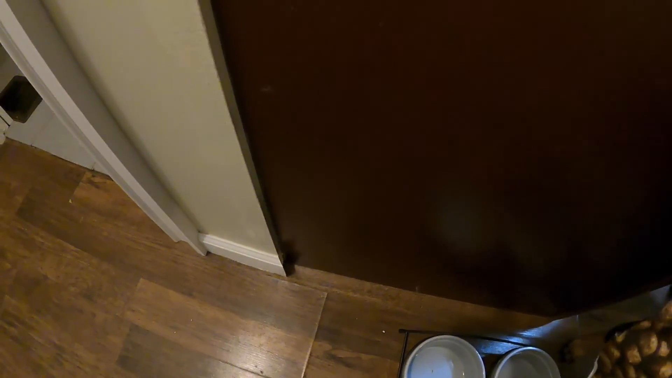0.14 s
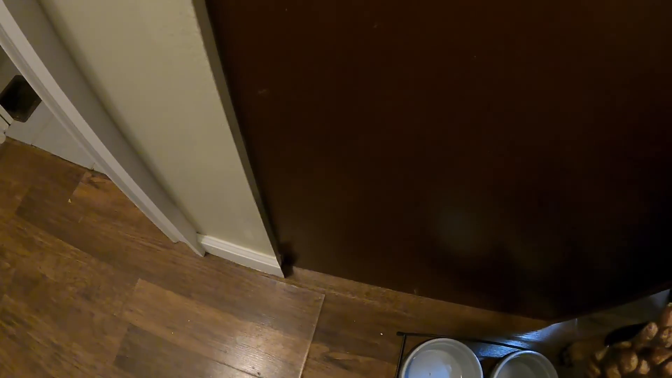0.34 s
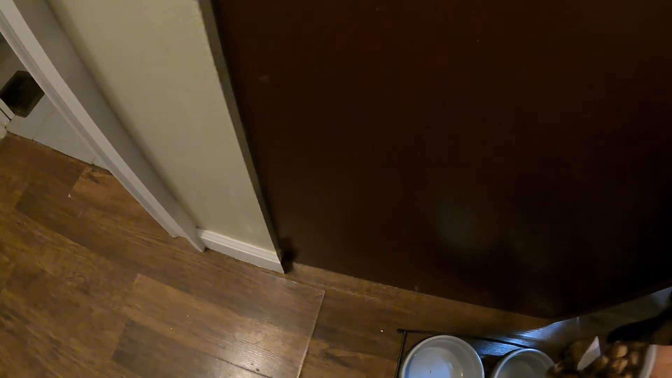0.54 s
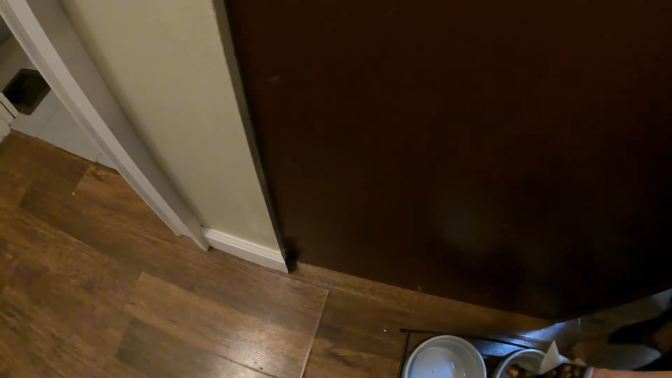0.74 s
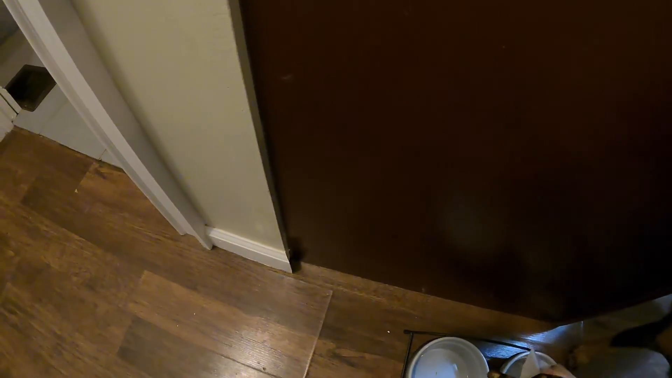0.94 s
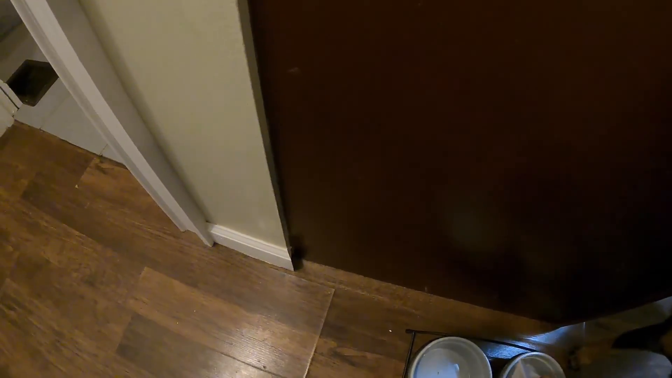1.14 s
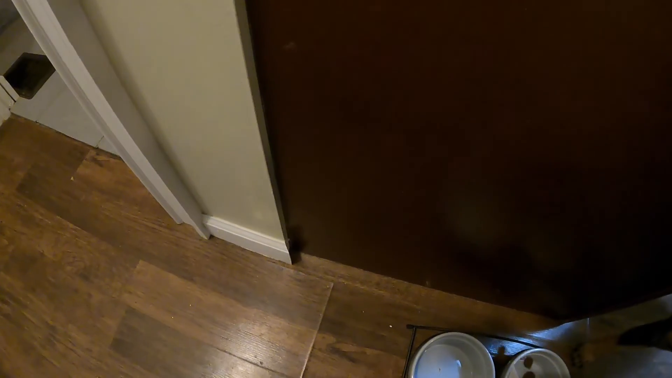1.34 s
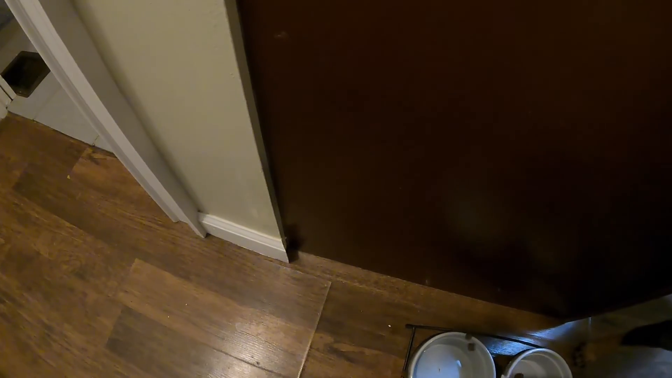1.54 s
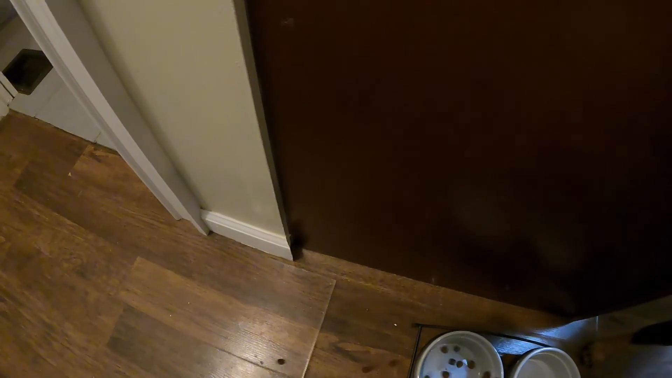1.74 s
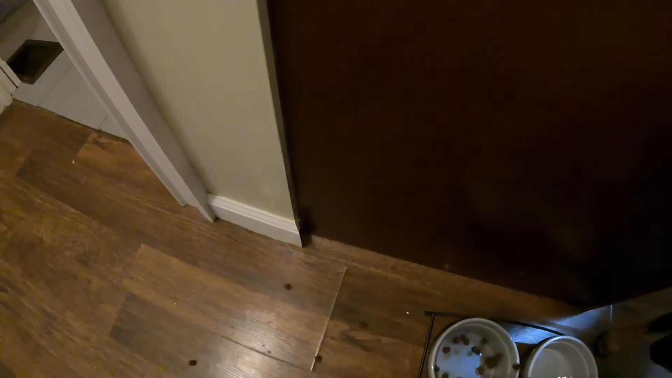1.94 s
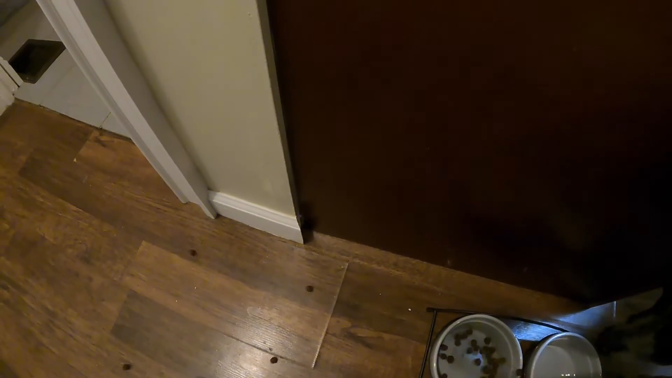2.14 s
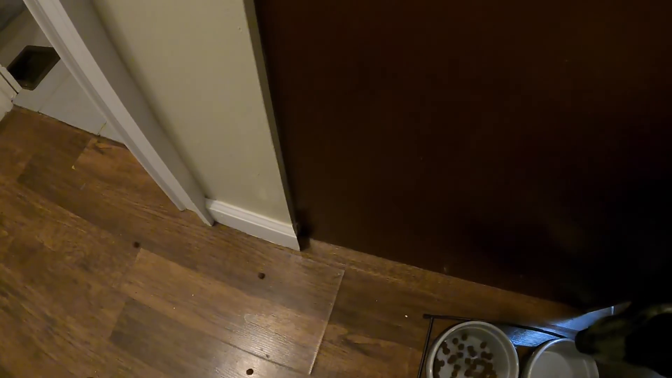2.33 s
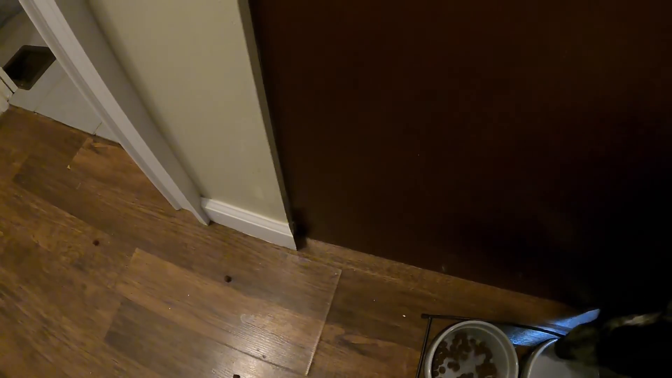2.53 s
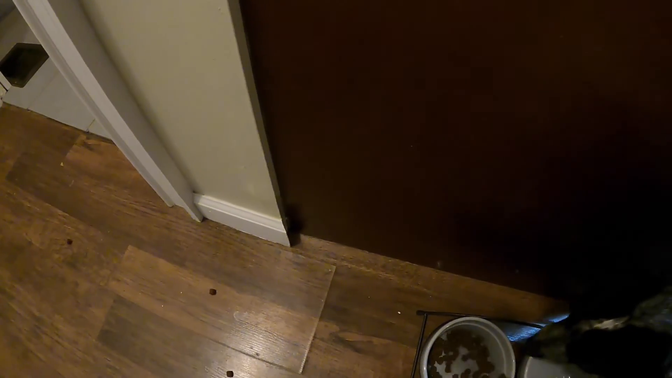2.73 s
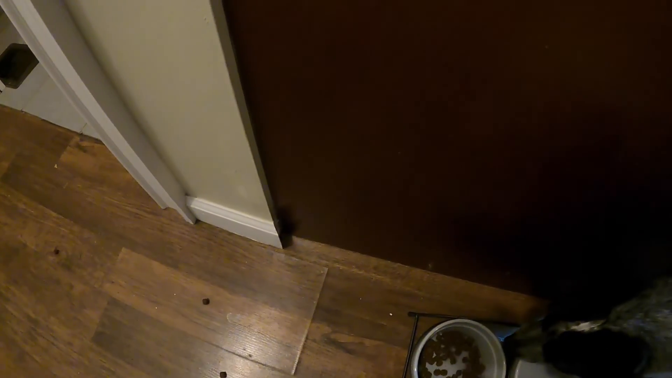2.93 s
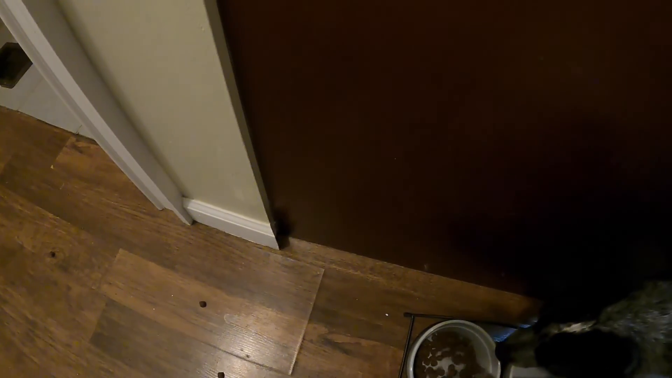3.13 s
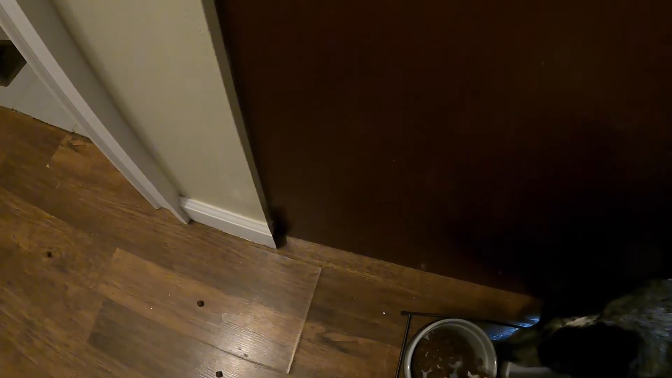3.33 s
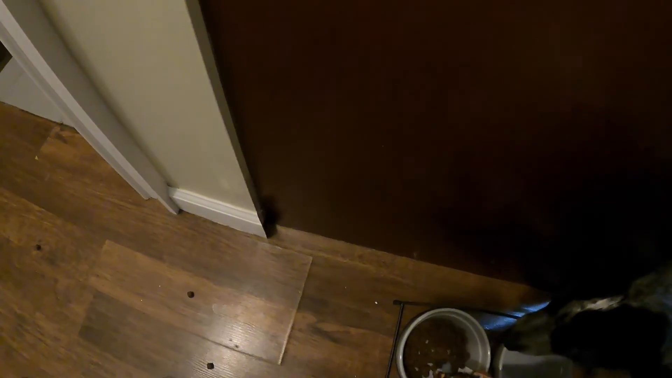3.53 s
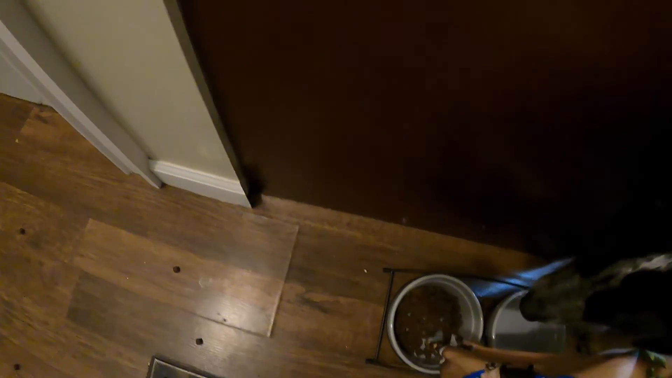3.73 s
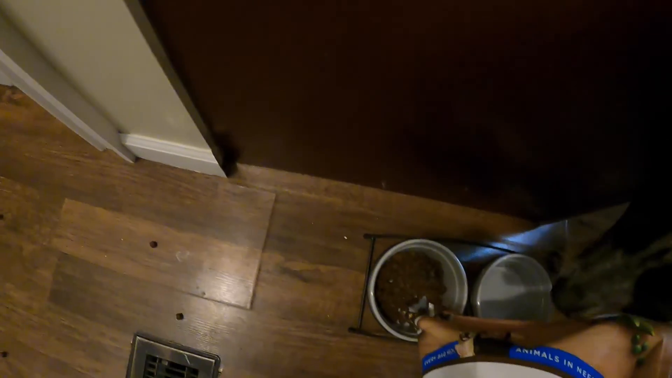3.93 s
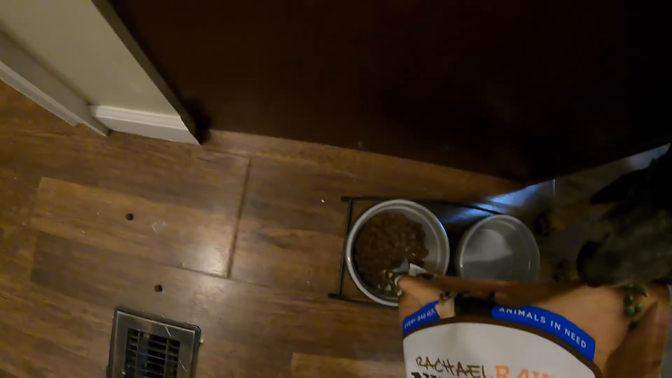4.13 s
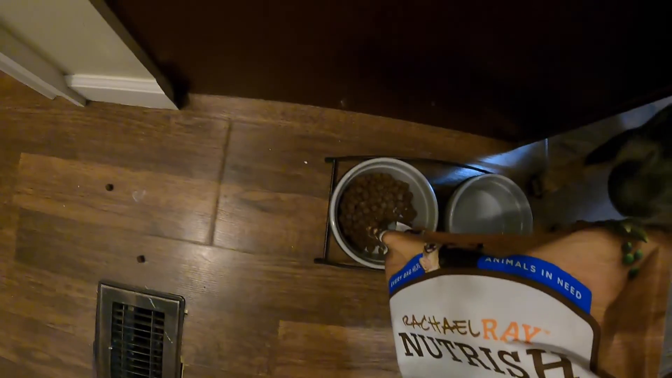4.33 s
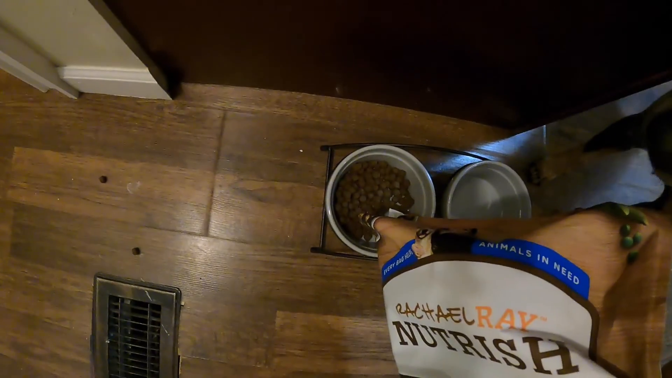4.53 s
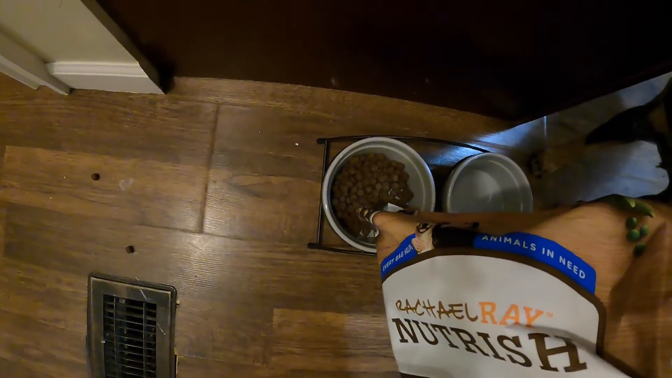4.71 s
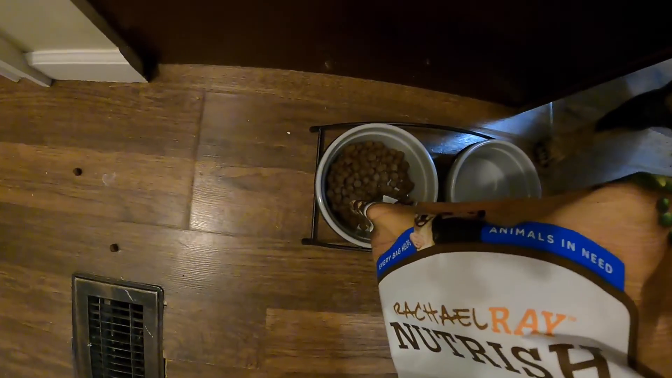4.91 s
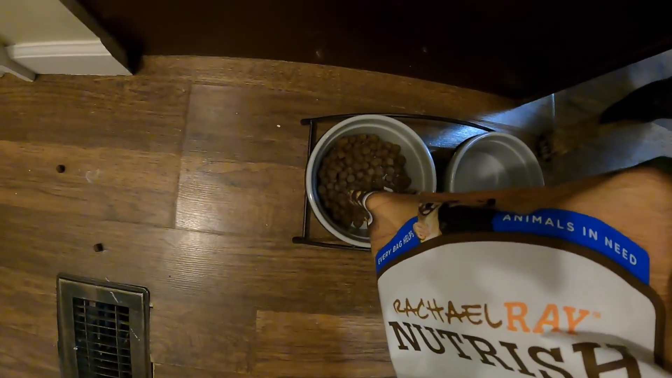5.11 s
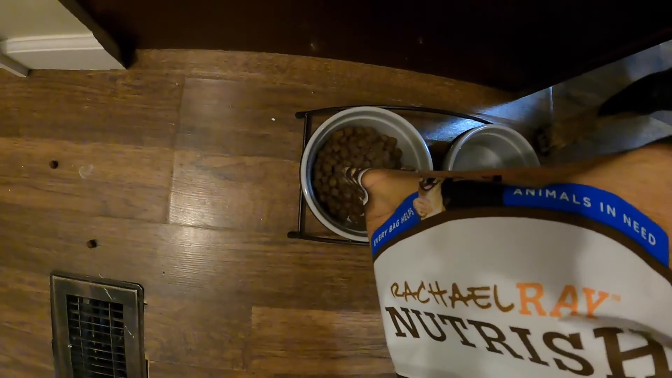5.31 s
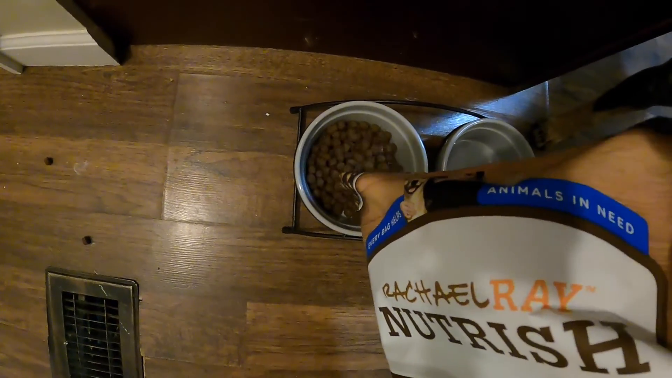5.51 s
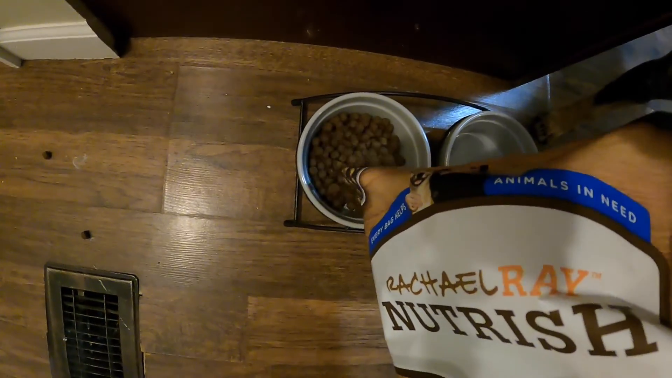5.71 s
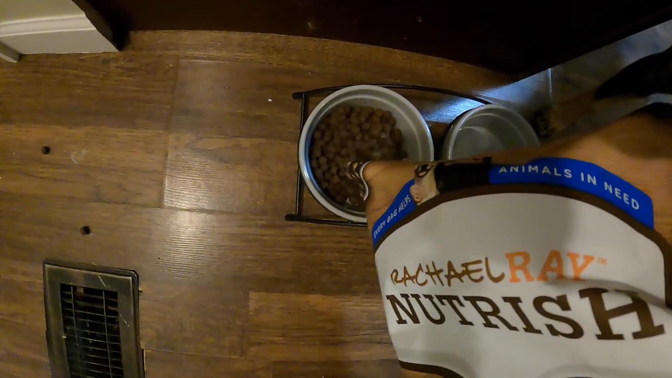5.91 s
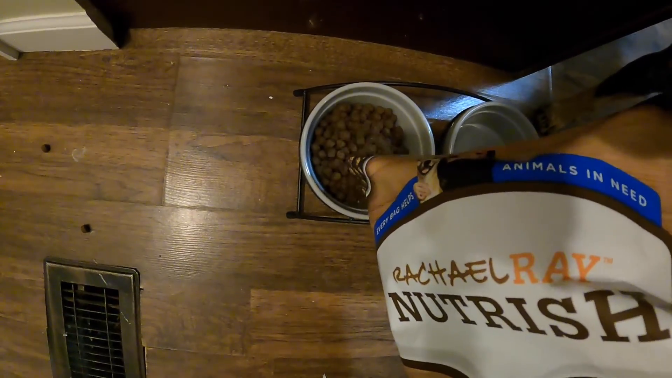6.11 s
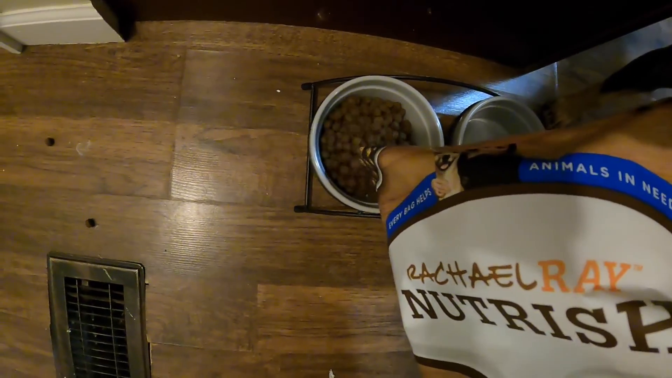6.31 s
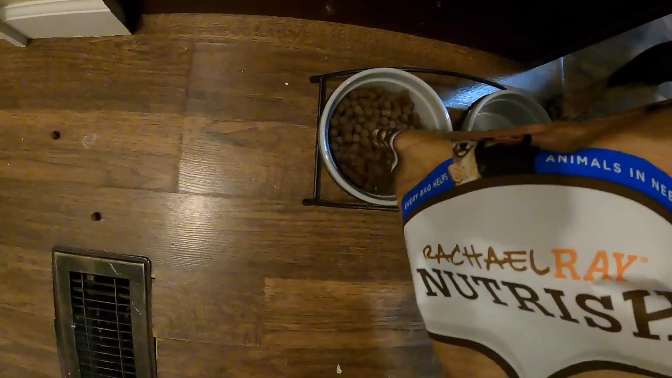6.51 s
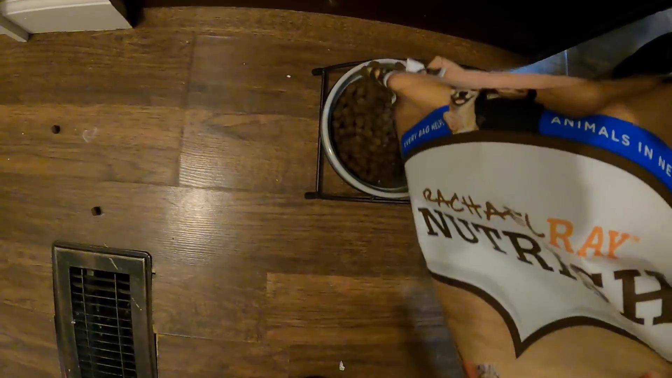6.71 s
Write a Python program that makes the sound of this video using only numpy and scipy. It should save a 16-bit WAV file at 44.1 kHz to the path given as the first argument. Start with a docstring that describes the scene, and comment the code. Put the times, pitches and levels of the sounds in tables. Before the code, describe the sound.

Close up in a small kitchen, a stiff plastic bag snaps and buckles while kibble shifts inside. Pellets then rattle into an empty steel bowl with bright, high pings. A brief pause, a second pour with shorter rings, more bag crackling, then a third pour that is dull and clacking on the full pile. Nearly mono, close microphone, slight hard-room echo.

```python
"""Dry kibble pours into a steel bowl: each pellet is a contact tick plus decaying bowl modes. As the bowl
fills, the pile damps the ring to a short tick and more pellets clack on other pellets. A plastic bag crackles
(filtered noise snaps), buckles (low swings) and crinkles as it is tipped. Kibble sliding in the bag drums,
rattles and scrapes as clouds of grains; strays ring an empty second bowl. A kitchen echo, a faint bright
difference between the channels, a microphone response and a limiter follow."""
import sys
import numpy as np
from scipy import signal
from scipy.io import wavfile
from scipy.ndimage import uniform_filter1d, minimum_filter1d

SR = 44100
rng = np.random.default_rng(int(sys.argv[2]) if len(sys.argv) > 2 else 0)


def write(x):
    x = np.atleast_2d(x).T
    wavfile.write(sys.argv[1], SR, np.round(np.clip(x, -1, 1) * 32767).astype(np.int16))


N = 297939
TIME = np.arange(N) / SR  # s


def gain_of(db):
    """Decibels to amplitude gain."""
    return 10 ** (np.asarray(db) / 20)


def evened(x):
    """Scales to rms 1."""
    return x / np.sqrt(np.mean(x ** 2) + 1e-20)


def read(points, hz):
    """Interpolates a spectrum on a log-frequency axis."""
    point_hz, value = np.transpose(points)
    return np.interp(np.log(hz + 1), np.log(point_hz + 1), value)


def follow(rows, time_s):
    """Interpolates every column of a curve at the given times."""
    row_s, *columns = np.transpose(rows)
    return [np.interp(time_s, row_s, column) for column in columns]


def add(mix, start_s, sound):
    """Mixes a sound in at start_s, cut at the end of the mix."""
    part = mix[max(round(start_s * SR), 0):][:len(sound)]
    part += sound[:len(part)]


def filtered(x, points, size=2048):
    """Minimum-phase filter with the given gains (Hz, dB)."""
    hz = abs(np.fft.fftfreq(size, 1 / SR))
    log_gain = np.log(gain_of(read(points, hz)))
    pulse = np.fft.ifft(np.exp(np.conj(signal.hilbert(log_gain)))).real
    return signal.oaconvolve(x, pulse)[:len(x)]


def colour(x, points, size=2048):
    """Gives white sound a spectrum and keeps its power."""
    gain = gain_of(read(points, np.fft.rfftfreq(size, 1 / SR)))
    return filtered(x, points, size) / np.sqrt(np.mean(gain ** 2))


def modes(hz, decay_db_per_s, t):
    """One exponentially decaying sine per bowl mode."""
    decay_per_s = np.float32(decay_db_per_s * np.log(10) / 20)[:, None]
    radians_per_s = np.float32(2 * np.pi * hz)[:, None]
    return np.exp(-decay_per_s * t) * np.sin(radians_per_s * t)


def grains(per_s, spread_db, low_hz, high_hz, cycles, wash=1.0, count=14):
    """Many small collisions of uneven size, each a few cycles at one of count pitches, over white noise; rms 1."""
    t = np.arange(1500) / SR
    out = np.zeros(N)
    for hz in np.geomspace(low_hz, high_hz, count):
        chance, strength = rng.random((2, N))
        hit = chance < per_s / count / SR
        over_db = spread_db * np.minimum(-np.log(1 - strength[hit]), 3)
        train = np.zeros(N)
        train[hit] = gain_of(over_db)
        age = t * hz / cycles
        grain = age * np.exp(-age) * np.sin(2 * np.pi * hz * t)
        band = signal.oaconvolve(train, grain)[:N]
        out += np.sqrt(hz) * evened(band)  # keeps the sum roughly white
    return evened(evened(out) + wash * rng.standard_normal(N))


def clumps(length_s=.022):
    """Little avalanches of pellets: random swells joined by lines, rms 1."""
    knots = rng.standard_normal(N // 100)
    return evened(np.interp(TIME / length_s, np.arange(len(knots)), knots))


POUR_EDGE_S = 0.08


def pouring(start_s, end_s):
    """One pour as a 0-1 gate with linear edges, half open at its start and end."""
    inside_s = np.minimum(TIME - start_s, end_s - TIME)
    return np.clip(inside_s / POUR_EDGE_S + .5, 0, 1)


# kibble moving in the bag, before the layer trims: [start_s, drum_db, rattle_db]
KIBBLE_FLOW = [(0, -28.5, -30.0), (0.2, -32, -39.5), (0.33, -31.5, -35.5), (1.17, -31, -36),
               (1.23, -26.5, -24.5), (1.42, -26, -28), (1.68, -24, -23), (1.85, -30, -33),
               (2.06, -34.5, -42.5), (3.14, -45, -41.5), (3.24, -41, -34.5), (3.45, -31, -33),
               (3.55, -36, -36.5), (4.25, -36.5, -37), (4.47, -26.5, -28.5), (4.68, -28.5, -31.5),
               (4.85, -35.5, -35), (4.94, -28.5, -28.0), (5.4, -28.5, -30), (5.85, -26, -24.5),
               (6.45, -30, -27), (6.76, -24.5, -22.5)]
# pours reaching the bowl: [start_s, end_s, light_hits_per_s, top_level_db, landed_scrape_db]
POURS = [(1.93, 2.857, 65, -16.5, -38), (3.186, 4.263, 60, -17.5, -43), (5.3, 6.747, 80, -15, -46.5)]
# pellets drumming on the bag: [pitch_hz, level_db_per_hz]
DRUM_SPECTRUM = [(25, -72), (60, -4.5), (100, -5.5), (150, -3.5), (220, 6), (320, 1.5), (420, 3.5),
                 (600, -2), (900, -15.5), (2000, -55), (8000, -90)]
# pellet rattling on pellet: [pitch_hz, level_db_per_hz]
RATTLE_SPECTRUM = [(300, -27), (600, 8.5), (900, 7), (1600, 6.5), (2200, 4.5), (3000, -0.5), (5000, -27.5),
                   (12000, -42)]
# pellets scraping: [pitch_hz, level_db_per_hz]
SCRAPE_SPECTRUM = [(1200, -24), (2600, 0), (3600, 3), (5000, -1.5), (6500, -8), (8000, -15.5),
                   (9300, -21.5), (12500, -20.5), (16000, -71)]


def sliding(drum_trim_db=-9.5, rattle_trim_db=-5.5, scrape_trim_db=-9.0, shared_surge_db=2.1, own_surge_db=1.17):
    """Pellets tumble down the bag and onto the pile; drum, rattle and scrape share most of their surges."""
    drum_db, rattle_db = follow(KIBBLE_FLOW, TIME)
    landing = sum(gain_of(db) * pouring(start_s, end_s) for start_s, end_s, _, _, db in POURS)
    bag_scrape = gain_of(rattle_db + scrape_trim_db)
    scrape_db = 20 * np.log10(np.hypot(bag_scrape, landing))
    drum = grains(per_s=740, spread_db=2.5, low_hz=135.4, high_hz=1135, cycles=0.79)
    rattle = grains(per_s=1800, spread_db=4.0, low_hz=426, high_hz=3800, cycles=0.88)
    scrape = grains(per_s=3600, spread_db=10.5, low_hz=1750, high_hz=12900, cycles=0.75)
    layers = [(drum_db + drum_trim_db, DRUM_SPECTRUM, drum),
              (rattle_db + rattle_trim_db, RATTLE_SPECTRUM, rattle),
              (scrape_db, SCRAPE_SPECTRUM, scrape)]
    surge_db = shared_surge_db * clumps()
    out = np.zeros(N)
    for level_db, spectrum, cloud in layers:
        moving_db = level_db + surge_db + own_surge_db * clumps()
        out += gain_of(moving_db) * colour(cloud, spectrum)
    return out


# treble absorbed by the soft film: [pitch_hz, gain_db]
FILM_LOSS = [(5500, 2), (10000, -14)]


def crease(hz, snap_s=0.0027, rise_s=0.00027, crest=3.33, size=1500):
    """A fold gives way in a quick run of slips that ring the stiff film around it."""
    t = np.arange(size) / SR
    slips = rng.standard_normal(size) * np.exp(-t / snap_s) * (1 - np.exp(-t / rise_s))
    film = [(hz / 8, -22), (hz / 2, -8), (hz, 0), (hz * 1.24, -5), (hz * 2.58, -17), (hz * 5, -38), (hz * 9, -55)]
    snap = filtered(colour(slips, film, size=512), FILM_LOSS, size=256)
    attack = slice(0, SR // 330)
    return snap / (crest * snap[attack].std())  # peak near 1


def buckle(hz, push_s=0.0028, flap=0.27, flap_s=0.011, size=4400):
    """A panel pops through in a few low swings, then flutters to rest."""
    t = np.arange(size) / SR
    push = t / push_s * np.exp(1 - t / push_s)
    pop = push * np.sin(2 * np.pi * hz * t)
    flutter = colour(rng.standard_normal(size), DRUM_SPECTRUM) * np.exp(-t / flap_s)
    return pop + flap * flutter


# loudest creases snapping; the one at 1.733 s is a dry pellet tick off the bowl: [start_s, peak_db, pitch_hz]
SNAPS = [(0.018, -8.5, 1620), (0.052, -5.5, 2020), (0.105, -8.5, 2070), (0.131, -2.5, 2700),
         (0.332, -2.5, 1850), (0.374, -6.5, 1540), (0.438, -5, 3350), (0.506, -5.5, 3870),
         (0.534, -6.5, 880), (0.601, -8.5, 2730), (0.669, -10.5, 1310), (0.751, -6, 1850),
         (0.805, -9, 2000), (0.949, 2.5, 2260), (1.24, 2, 1260), (1.733, 5.5, 4600), (3.222, -1.5, 4650),
         (4.347, -0.5, 2000), (4.417, -4.5, 2280), (4.507, -12, 1460), (4.554, -6, 2280), (4.669, -5, 1260),
         (4.835, -10.5, 840), (4.993, -2, 1030), (5.025, -3, 2060), (5.155, -4.5, 3650),
         (5.232, -3.5, 3230)]
# bag panels buckling: [start_s, peak_db, pitch_hz]
BUCKLES = [(0.02, -6.5, 284), (0.308, -13.5, 224), (0.422, -12, 225), (0.671, -9, 290), (0.771, -14.5, 229),
           (0.806, -14, 230), (0.946, -11, 404), (1.039, -16, 245), (1.115, -12.5, 237), (1.222, -8.5, 388),
           (1.237, -5, 373), (1.654, -6, 446), (1.885, -15, 224), (3.397, -13, 234), (4.427, -16, 236),
           (4.668, -11, 420), (4.992, -9.5, 440), (5.229, -12, 570)]
# random crinkles: loudest over KIBBLE_FLOW's drum_db, capped at the top; log-normal pitch
CRINKLES_PER_S, CRINKLE_HZ, CRINKLE_OCTAVES = 26, 1640, 0.52
CRINKLE_OVER_DB, CRINKLE_SPREAD_DB, CRINKLE_TOP_DB = 18, 9.5, -12


def bag():
    """The tipped film snaps, thumps and faintly crinkles; one dry pellet tick shares the snap's sound."""
    out = np.zeros(N)
    for start_s, peak_db, hz in SNAPS:
        add(out, start_s, gain_of(peak_db) * crease(hz))
    for start_s, peak_db, hz in BUCKLES:
        add(out, start_s, gain_of(peak_db) * buckle(hz))
    for start_s in TIME[rng.random(N) < CRINKLES_PER_S / SR]:
        drum_db, _ = follow(KIBBLE_FLOW, start_s)
        loudest_db = min(drum_db + CRINKLE_OVER_DB, CRINKLE_TOP_DB)
        peak_db = loudest_db - CRINKLE_SPREAD_DB * rng.random()
        hz = CRINKLE_HZ * 2 ** (CRINKLE_OCTAVES * rng.standard_normal())
        add(out, start_s, gain_of(peak_db) * crease(hz))
    return out


HALF_FULL_S, FILL_S = 4.07, 0.37


def fullness(time_s):
    """How full the bowl is, 0-1, along an S-curve."""
    return 1 / (1 + np.exp((HALF_FULL_S - time_s) / FILL_S))


# pellet contact tick: [pitch_hz, level_db_per_hz]
TICK_SPECTRUM = [(200, -12.5), (1700, -11.5), (2500, -1), (3200, 7.5), (5500, -5.5), (7500, -12.5),
                 (10000, -23), (12500, -28), (16000, -36)]


def clack(clack_s=0.0031, size=600):
    """One pellet on another: a dry noise tick with no ring."""
    burst = rng.standard_normal(size) * np.exp(-np.arange(size) / SR / clack_s)
    tick = colour(burst, TICK_SPECTRUM, size=256)
    attack = slice(0, SR // 220)
    return tick / tick[attack].std()


# modes of the empty bowl, most in close pairs: [pitch_hz, level_db, t60_s]
BOWL_MODES = [(2619, 11.5, 0.42), (2692, 6, 0.025), (2990, -13.5, .03), (4690, 17, 0.081),
              (4786, -5.5, 0.046), (6057, -4, 0.048), (6128, -2, 0.089), (7020, -18, 0.088),
              (7060, -15, 0.37), (7300, -32, 0.089), (8300, -19.5, 0.094), (8340, -14, 0.22),
              (9100, -21, 0.16), (10350, -23.5, 0.06), (11340, -26.5, 0.11), (10990, -15, 0.06),
              (13200, -31, 0.14)]
UPPER_HZ = 3500  # upper rings start here
# extra decay and pitch rise at the second mode, before the per-hit press
EMPTY_DB_PER_S, FULL_DB_PER_S, FULL_HZ = 28, 4300, 153


def pellet(full, low_db, high_db, spot_db=4.5, tick_db=-5, dead_db=4, tick_s=0.0012, contact_s=0.00038,
           scatter=0.85, detune_hz=11, size=11000):
    """One pellet on steel: a contact tick and bowl modes, weighted by landing spot and damped by the pile."""
    t = np.arange(size, dtype=np.float32) / SR
    hz, mode_db, t60_s = np.transpose(BOWL_MODES)
    weight = gain_of(mode_db + spot_db * rng.standard_normal(len(hz)))
    press = np.exp(scatter * rng.standard_normal())  # the pile shifts between hits
    grip = hz[1] / hz  # the pile grips low modes most
    detune = detune_hz * rng.standard_normal(len(hz)) / grip  # loose pellets resting on the wall
    mode_hz = hz + detune + FULL_HZ * full * press * grip
    pile_db_per_s = (EMPTY_DB_PER_S + FULL_DB_PER_S * full) * press * grip ** 0.81
    sines = modes(mode_hz, 60 / t60_s + pile_db_per_s, t)
    attack = slice(0, SR // 220)
    ring = np.zeros(size)
    for group, level_db in ((hz < UPPER_HZ, low_db), (hz >= UPPER_HZ, high_db)):
        part = np.float32(weight * group) @ sines
        ring += gain_of(level_db) * part / part[attack].std()
    tick_size = size // 10
    burst = rng.standard_normal(tick_size) * np.exp(-t[:tick_size] / tick_s)
    tick_gain = gain_of(tick_db + dead_db * full) * ring[attack].std()  # more tick when full
    add(ring, 0, tick_gain * colour(burst, TICK_SPECTRUM, size=256))
    onset = 1 - np.exp(-t / contact_s)
    fade = np.minimum(1, 2 * (1 - t / t[-1]))
    return ring * onset * fade


# hardest pellet hits on steel, before strike_db: [start_s, low_ring_db, upper_rings_db]
STRIKES = [(1.678, -24, -14.5), (1.7809, -43, -4), (1.8422, -18, -7), (1.8938, -17.5, -18),
           (1.9175, -42, -7), (1.9347, -37.5, -6.5), (1.964, -29, -11.5), (1.9768, -10.5, -5.5),
           (2.0021, -36, -3), (2.0414, -16, -3.5), (2.0946, -11, -8.5), (2.1427, -23, -15.5),
           (2.1615, -20, -6.5), (2.2361, -26, -11), (2.271, -28, -14.0), (2.3393, -27, -11.5),
           (2.3719, -21.5, -7.5), (2.3833, -25, -22), (2.4179, -10.5, -4), (2.4545, -24, -3.5),
           (2.4627, -13, -8), (2.552, -14.5, 0), (2.5807, -12, -10), (2.6272, -25, -7), (2.6456, -10, -8),
           (2.74, -13, -8.5), (2.7757, -15.5, -19), (2.7999, -13.5, -9.5), (2.8162, -11.5, -5),
           (2.9031, -18.5, -16.5), (2.9202, -23, -11.5), (2.9487, -30, -18.5), (2.9727, -10, -8),
           (3.0112, -22, -14.5), (3.0529, -21, -10.0), (3.0843, -19, -9.5), (3.1838, -48, -14.5),
           (3.3051, -8, -9.5), (3.333, -13.5, -3), (3.3691, -16, -11), (3.4417, -6, -4.5),
           (3.5053, -19, -5), (3.5726, -30, -13.5), (3.6077, -12, -4.5), (3.6735, -18, -19),
           (3.7216, -23, -15), (3.7372, -23, -16.5), (3.8115, -45, -18.0), (3.8835, -14.5, -10),
           (3.9363, -18.5, -18), (3.9893, -26, -20.5), (4.0451, -18.0, -19.5), (4.0734, -13, -19.5),
           (4.1256, -13.5, -20.5), (4.2103, -6.5, -15), (4.2272, -25, -18.5), (5.3159, -5.5, -13),
           (5.3457, -14.5, -17.5), (5.3835, -23, -17.5), (5.4162, -18.5, -20), (5.436, -21, -20),
           (5.4597, -14.5, -32), (5.5335, -14, -18), (5.6228, -7.5, -17), (5.661, -2.5, -12),
           (5.6889, -9, -33), (5.7247, -11.5, -30), (5.8692, -3.5, -40), (5.8982, -9.5, -39),
           (6.012, -13.5, -42), (6.0888, -12, -37), (6.1237, -2, -34.0), (6.1752, -15, -25.0),
           (6.2392, -11.5, -26), (6.4378, -14, -33.0)]
BOUNCE_S, BOUNCE_LOSS_DB = 0.022, 11.5  # longest gap, loss per rebound
SPREAD_DB, MUFFLE_DB = 18.5, 9  # light hits: range under top level, upper-ring loss when full
ON_PILE, CLACK_DB = 0.6, -3  # share of light hits on the pile when full, clack over ring level


def bowl(strike_db=2):
    """Hard strikes rebound twice; light random hits fill each pour, more of them on the pile as it grows."""
    out = np.zeros(N)
    for hit_s, low_db, high_db in STRIKES:
        gain = gain_of(strike_db)
        for _ in range(3):
            add(out, hit_s, gain * pellet(fullness(hit_s), low_db, high_db))
            hit_s += BOUNCE_S * rng.uniform(.2, 1)
            gain = gain * gain_of(-BOUNCE_LOSS_DB)
    for start_s, end_s, per_s, top_db, _ in POURS:
        for hit_s in TIME[rng.random(N) < pouring(start_s, end_s) * per_s / SR]:
            full = fullness(hit_s)
            low_db, high_db = top_db - SPREAD_DB * rng.random(2)
            if rng.random() < ON_PILE * full:
                add(out, hit_s, gain_of(low_db + CLACK_DB) * clack())
            else:
                add(out, hit_s, pellet(full, low_db, high_db - MUFFLE_DB * full))
    return out


# stray pellets clipping the second bowl: [start_s, level_db]
STRAYS = [(1.678, -13.5), (1.955, -12), (3.407, -21), (4.1738, -25), (5.738, -25.5), (6.502, -20.5),
          (6.691, -16.5)]
# modes of the second bowl: [pitch_hz, level_db, t60_s]
SECOND_BOWL_MODES = [(2280, -5.5, 0.27), (3865, -3, 0.43), (5870, 4.5, 0.088), (7900, -7.5, 0.13),
                     (10060, -12, 0.083)]


def second_bowl(spot_db=1.5, size=15000):
    """An empty bowl beside the first rings undamped by any pile when a stray pellet clips it."""
    t = np.arange(size) / SR
    hz, mode_db, t60_s = np.transpose(SECOND_BOWL_MODES)
    out = np.zeros(N)
    for start_s, level_db in STRAYS:
        weight = gain_of(mode_db + spot_db * rng.standard_normal(len(hz)))
        weight /= np.linalg.norm(weight)
        add(out, start_s, gain_of(level_db) * weight @ modes(hz, 60 / t60_s, t))
    return out


# room decay: [pitch_hz, t60_s]
KITCHEN_DECAY = [(150, 0.25), (400, 0.23), (1000, 0.096), (3000, 0.32), (7000, 0.61), (14000, 0.28)]


def kitchen(x, size=22050):
    """Dense random wall reflections after 3 ms, each band dying at its own speed."""
    arrives = (rng.random(size) < 3000 / SR) * (np.arange(size) > .003 * SR)
    taps = rng.standard_normal(size) * arrives
    hz, t, bands = signal.stft(taps, SR, nperseg=256)
    decay_db = -60 * t / read(KITCHEN_DECAY, hz)[:, None]
    tail = signal.istft(bands * gain_of(decay_db), SR)[1]
    return signal.fftconvolve(x, tail / np.linalg.norm(tail))[:N]


# faint bright difference between the channels, following the sound: [pitch_hz, gain_db]
SIDE_DIFFERENCE = [(60, -32), (200, -54), (600, -57), (1400, -55), (3000, -57), (6000, -39), (10000, -29),
                   (13000, 1)]


def scene(bowl_room_db=-18, bag_room_db=-13, flow_room_db=-9):
    """Bowls and bag lie straight ahead, nearly mono; a faint bright hiss that follows the sound is added with
    opposite sign left and right."""
    steel, film, flow = bowl() + second_bowl(), bag(), sliding()
    room = kitchen(gain_of(bowl_room_db) * steel + gain_of(bag_room_db) * film + gain_of(flow_room_db) * flow)
    direct = steel + film + flow
    side = filtered(kitchen(direct), SIDE_DIFFERENCE)
    return direct + room + np.array([side, -side])


# microphone's thin bass, treble notches and dull top: [pitch_hz, gain_db]
MICROPHONE = [(20, -20), (60, -9), (130, 0), (7900, 0), (8500, -2), (9000, -12), (9600, 0), (12400, 1),
              (13200, -4), (13900, -17), (16000, -20)]
EDGE_HZ = 16000


def record(dry, recover_db_per_s=120, ceiling_db=-.4):
    """Microphone response, a fast limiter with linear dB recovery, then a low-pass at EDGE_HZ."""
    heard = np.array([filtered(channel, MICROPHONE, size=4096) for channel in dry])
    peak_db = 20 * np.log10(abs(heard).max(0) + 1e-9)
    over_db = np.maximum(peak_db - ceiling_db, 0)
    fall_db = TIME * recover_db_per_s
    held_db = np.maximum.accumulate(over_db + fall_db) - fall_db
    limit_db = uniform_filter1d(minimum_filter1d(-held_db, size=45), size=45)
    limited = heard * gain_of(limit_db)
    low_pass = signal.firwin(255, EDGE_HZ, window=("kaiser", 9), fs=SR)
    return signal.oaconvolve(limited, low_pass[None], "same")


dry = scene()
out = record(dry)
write(out)
```